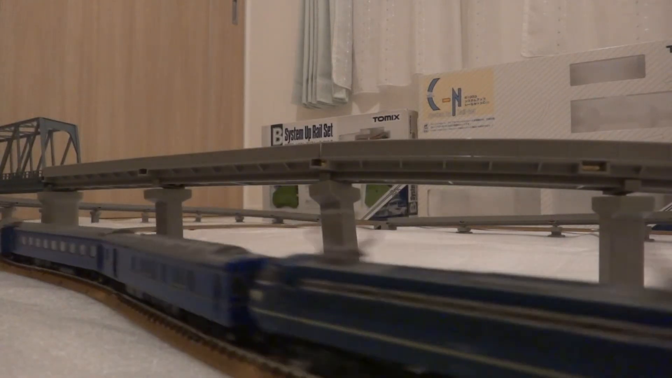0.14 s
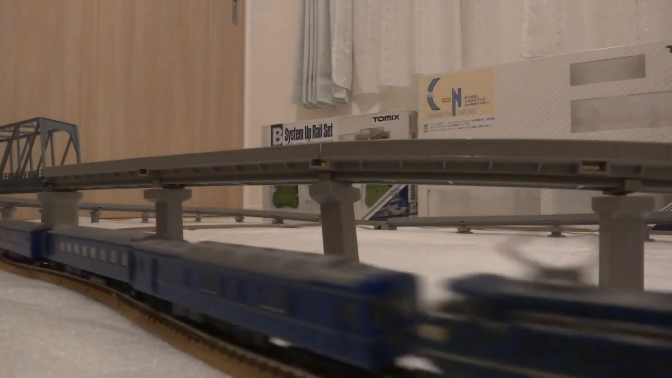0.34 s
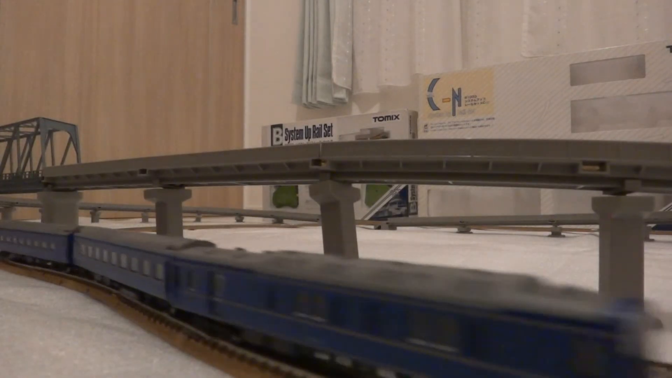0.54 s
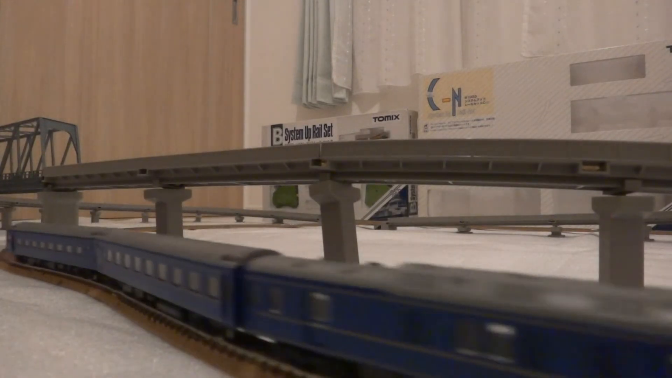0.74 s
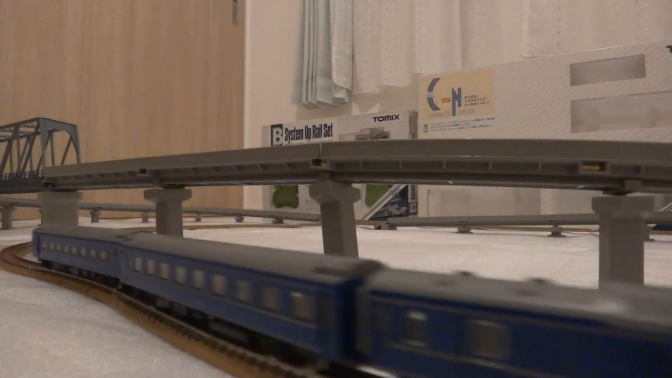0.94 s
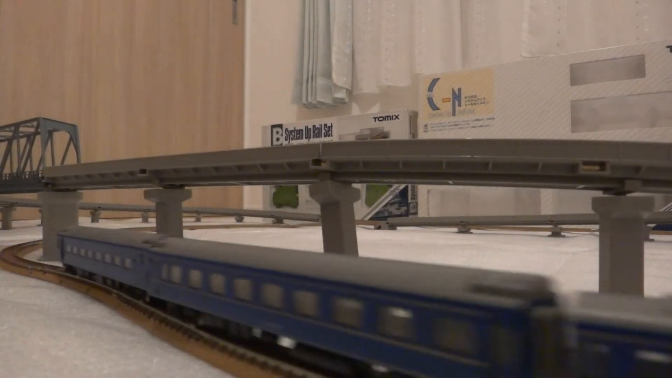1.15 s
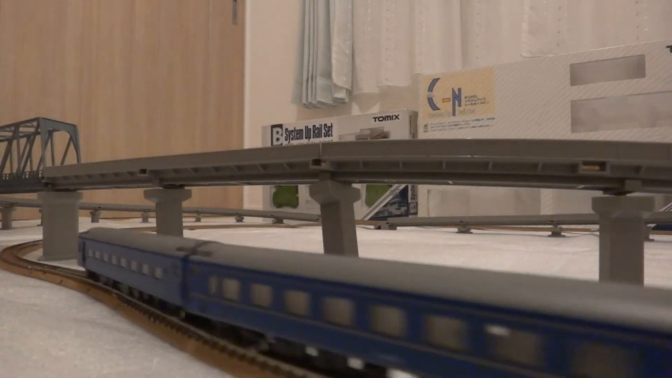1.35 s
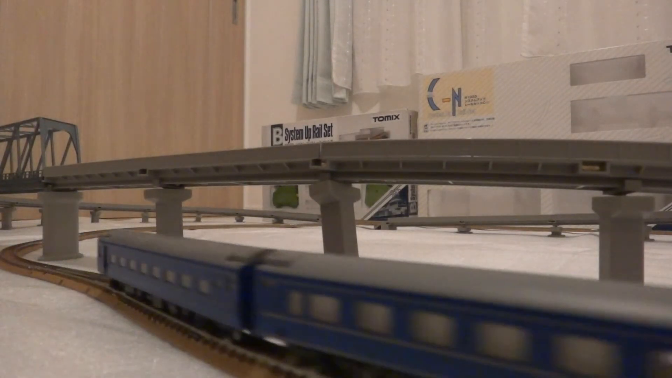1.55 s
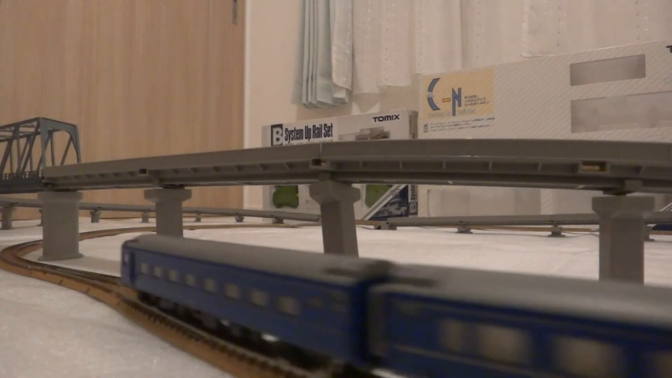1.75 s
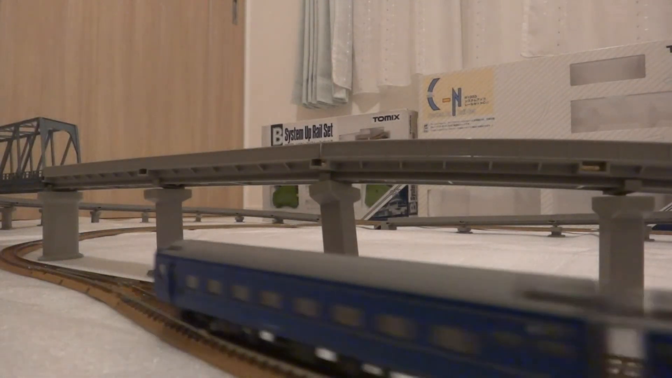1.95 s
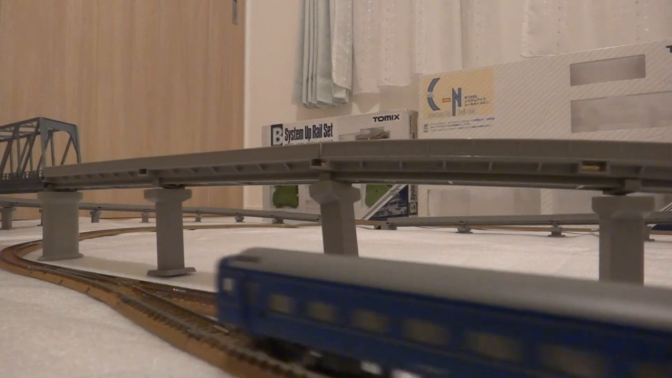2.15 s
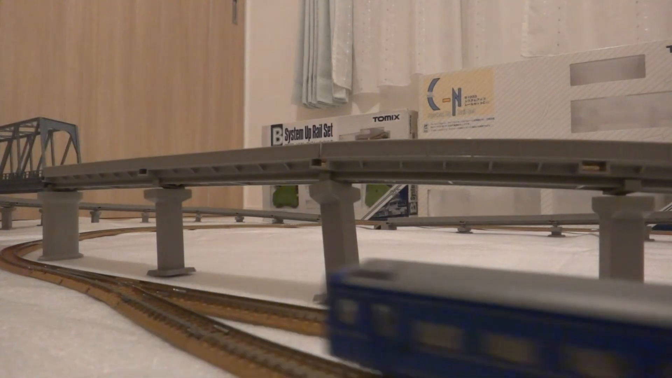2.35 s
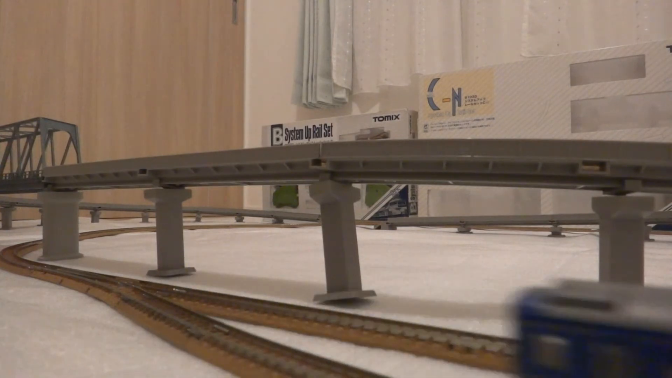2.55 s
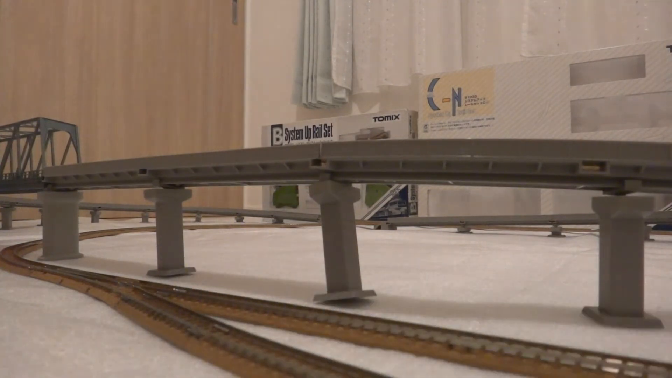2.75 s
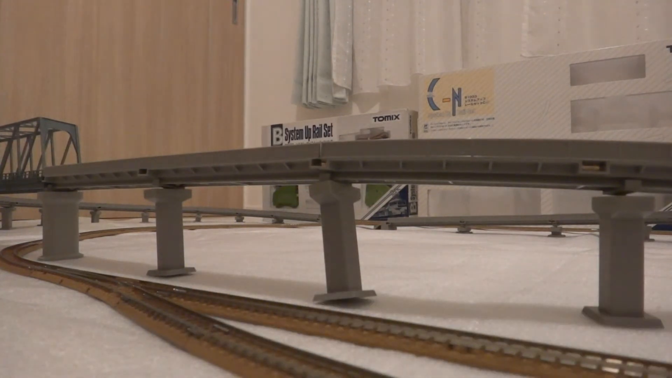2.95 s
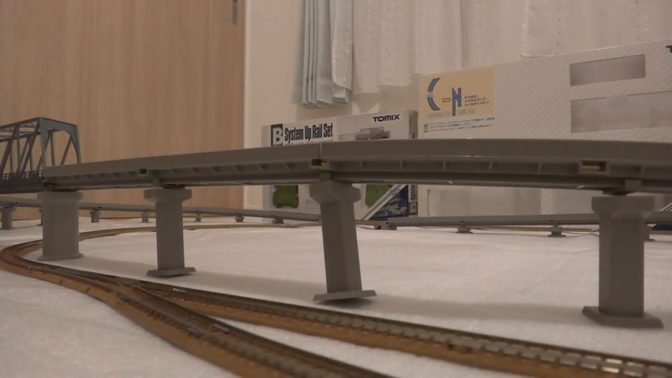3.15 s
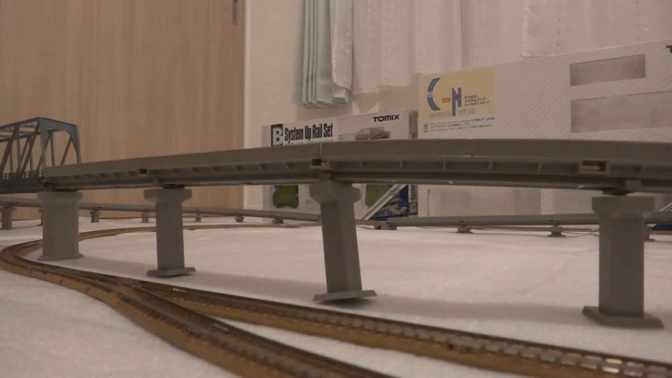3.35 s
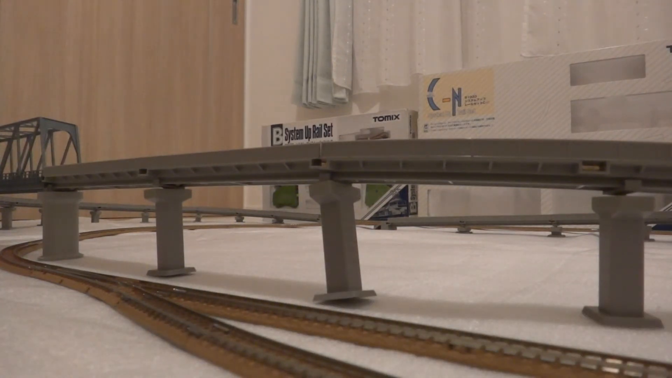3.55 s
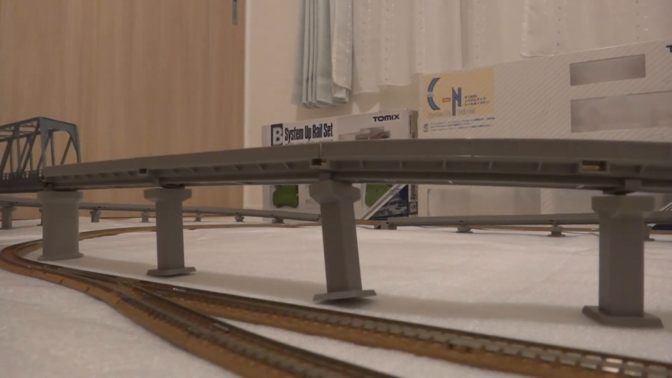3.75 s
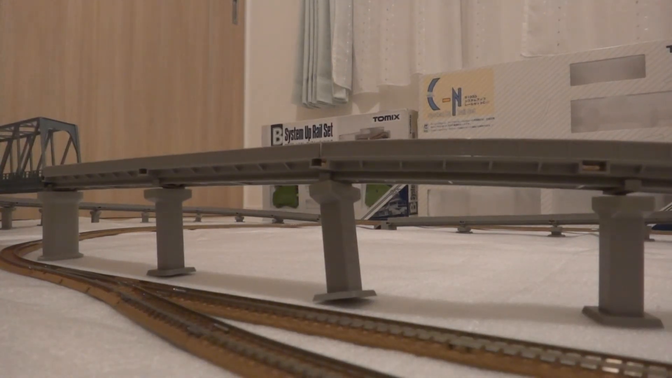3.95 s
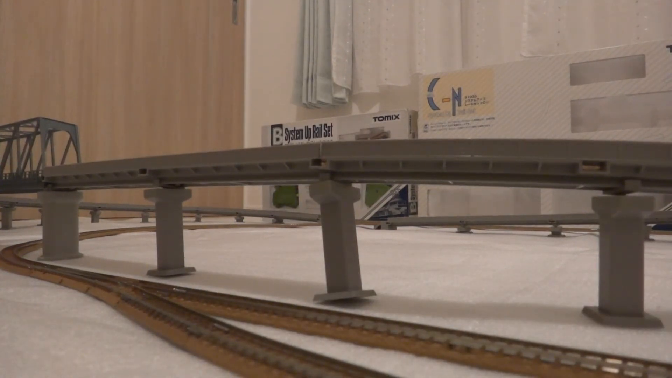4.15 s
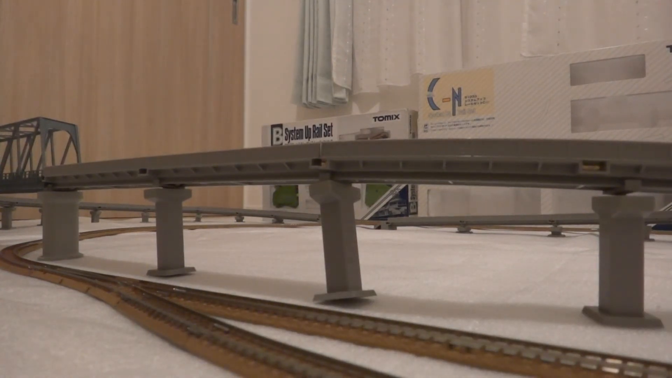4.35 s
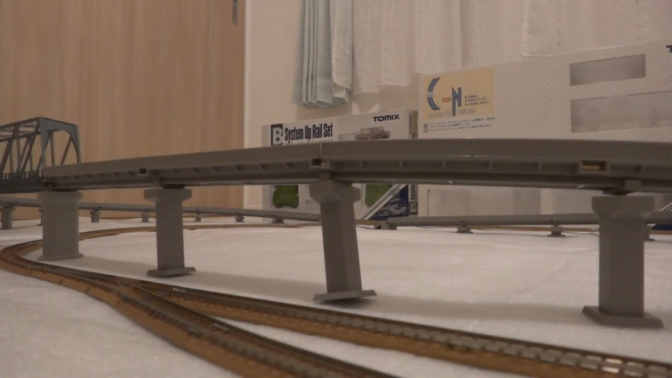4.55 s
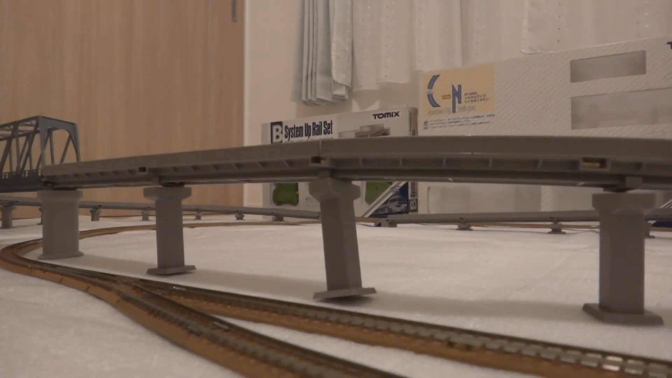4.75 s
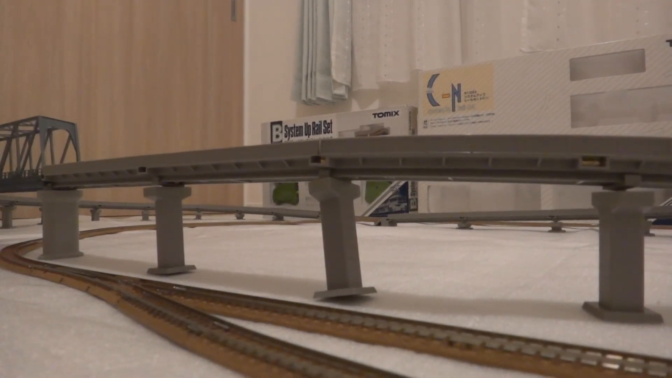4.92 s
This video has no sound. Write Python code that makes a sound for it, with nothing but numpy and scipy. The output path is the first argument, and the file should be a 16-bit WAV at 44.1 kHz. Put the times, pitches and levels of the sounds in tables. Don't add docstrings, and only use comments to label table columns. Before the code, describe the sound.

A microphone low beside plastic track catches a tiny electric train already passing: buzzing shell, hissing brushes, then a dense, dry, treble-heavy wheel roar with crisp clicks over rail joints. The coaches leave after nearly three seconds. Short scraping hisses mark the curve, then the sound thins and dulls to distant metallic rolling around the room, with occasional paired ticks and faint recorder hiss.

```python
import sys
import numpy as np
from scipy import signal
from scipy.fft import rfft, irfft, next_fast_len
from scipy.io import wavfile

SR = 44100
rng = np.random.default_rng(int(sys.argv[2]) if len(sys.argv) > 2 else 0)


def ratio_of_db(decibels):
    return 10 ** (np.asarray(decibels, float) / 20)


def wav_out(sig):
    wavfile.write(sys.argv[1], SR, np.round(np.clip(np.atleast_2d(sig).T, -1, 1) * 32767).astype(np.int16))


N = 224067

# time_s, level_db
MOTOR_RATTLE = [(0, -30.5), (.14, -26), (.21, -25), (0.234, -22.5), (.275, -20), (.3, -20.5), (.335, -21.5),
                (.355, -30), (.41, -23.5), (.46, -26), (.5, -22.5), (.57, -23), (.59, -24), (1.0, -27)]
# pitch_hz, width_hz
SHELL_MODES = [(2910, 760), (3860, 240), (4620, 190)]
# level_db (re rattle at mid-pass), change_db_per_s
SHELL_TURNING = [(0.5, 0.5), (-4, -3), (-5.5, 10)]
# pitch_hz, width_hz, level_db
BRUSH_BANDS = [(7900, 1500, -5.5), (8720, 820, 0.5), (9280, 900, 0.5), (10000, 900, -1),
               (10700, 1000, -2.5), (12200, 1500, -6), (14200, 500, -9), (15200, 1100, -11)]
# time_s, turns_per_s, whine_db
ROTOR = [(0, 191, -68), (.1, 194, -61), (.25, 199, -59), (.33, 203, -55), (.4, 192, -57), (.43, 190, -80),
         (1.0, 200, -85)]
# multiple_of_turn_rate, level_db
WHINE_HARMONICS = [(1, -19), (3, -9), (4, 0)]
# time_s, share_0_to_1
STRUCK_SHARE = [(0, .15), (.2, .3), (.24, .75), (.33, .7), (.4, .3), (.5, .45), (.6, .3), (1.0, .2)]

# time_s, level_db
ROAR = [(0, -23), (.25, -21.5), (.6, -20.5), (.9, -22), (1.2, -23.5), (1.35, -21.5), (1.58, -24.5),
        (1.85, -23), (2.04, -22.5), (2.18, -23), (2.5, -25.5), (2.76, -28.5), (3.3, -28), (3.4, -29),
        (3.46, -30), (4.0, -31), (4.7, -31), (5.08, -31)]
# pitch_hz, density_db_per_hz
NEAR_SPECTRUM = [(15, -75), (25, -44), (148, -36.5), (267, -22.5), (583, -21), (1030, -6), (1270, -4.5),
                 (1710, 0), (2180, 0), (4760, -1.5), (6940, -2.5), (8380, -3.5), (11000, -2.5), (12900, -8),
                 (15600, -23)]
# pitch_hz, density_db_per_hz
FAR_SPECTRUM = [(15, -70), (25, -41), (188, -23.5), (227, -31.5), (483, -20), (1110, -23.5), (1240, -20),
                (2180, -9), (2850, 2.5), (3180, -7), (5160, 2.5), (6580, -8), (9850, -4.5), (11000, -13),
                (15600, -29)]
# pitch_hz, likeness_0_to_1
CHANNEL_LIKENESS = [(60, 1), (180, 0.58), (550, 0.79), (1650, 0.92), (4970, 0.9), (15000, 0.92)]
# time_s, distance_0_to_1
DISTANCE_COLOUR = [(0, 0.055), (.6, 0.097), (2.6, 0.31), (2.95, 0.74), (3.6, 0.75), (5.08, 0.79)]
# time_s, level_db
TRACK_LOAD = [(0, -12.5), (.45, -12), (.52, -8), (.7, -6), (.9, 0), (1.9, 2.5), (2.4, 3), (2.84, 9),
              (2.93, 1), (5.08, 3)]
# time_s, length_s, brightness_db
WHEEL_GLINTS = [(0.103, 0.13, 0.5), (0.334, 0.073, 2), (0.844, 0.06, 0.5), (1.05, 0.11, 0),
                (1.455, 0.047, -2), (1.71, 0.073, 2), (1.835, 0.046, 3), (2.095, 0.14, 4),
                (2.802, 0.13, 2.5), (3.005, 0.05, -1.5), (3.338, 0.053, 5.5), (4.003, 0.18, -4)]
# loudest_s, length_s, pitch_hz, level_db
COACH_PANELS = [(0.519, 0.0054, 597, -47), (.52, .006, 700, -50), (0.575, 0.054, 1050, -48),
                (1.004, 0.25, 1054, -42), (1.85, 0.15, 1110, -44), (2.396, 0.18, 1310, -38.5),
                (2.79, 0.048, 1160, -43), (.15, .15, 2180, -35.5), (0.606, 0.098, 2080, -31),
                (0.76, 0.25, 1670, -34), (0.934, 0.19, 1890, -33.5), (1.133, 0.14, 1566, -35),
                (1.354, 0.086, 1840, -36), (1.8, 0.04, 1730, -44), (1.927, 0.084, 1720, -34.5),
                (2.202, 0.27, 1676, -38), (.13, 0.026, 1000, -52), (0.23, .04, 1130, -47),
                (.36, 0.081, 1110, -48), (2.2, 0.17, 1940, -36), (2.73, 0.28, 1820, -39),
                (2.84, 0.13, 1505, -40), (1.203, 0.06, 2630, -32), (1.303, 0.11, 3360, -33),
                (1.348, .08, 4070, -36), (1.756, 0.058, 2810, -33.5), (1.814, 0.079, 3070, -30.5),
                (1.92, 0.076, 3620, -32), (2.116, 0.058, 3280, -33), (2.197, .06, 2700, -38),
                (2.55, 0.065, 3400, -32), (2.68, 0.081, 3910, -32.5), (1.45, 0.086, 4800, -36),
                (1.746, .05, 4800, -31), (2.13, 0.044, 4820, -29), (2.226, 0.046, 4500, -31),
                (2.4, 0.15, 4640, -32), (.9, .08, 5500, -34), (0.95, 0.04, 6370, -31),
                (1.853, 0.046, 5700, -37), (1.85, .05, 6560, -39), (2.148, .08, 6340, -32),
                (2.353, 0.093, 6400, -35), (2.78, 0.056, 5800, -31), (0.397, 0.25, 7670, -29),
                (1.4, .1, 8350, -29.5), (1.75, 0.074, 8240, -35), (1.997, 0.097, 8100, -31),
                (2.15, 0.079, 8900, -27.5), (2.2, 0.053, 10000, -31), (2.098, 0.066, 10900, -31),
                (2.747, 0.071, 7800, -34), (.45, .1, 14200, -31)]

# release_s, build_up_s, pitch_hz, level_db
FLANGE_RUBS = [(3, .2, 4750, -35), (3.05, .15, 4750, -35.5), (2.6, 0.09, 4750, -36),
               (3.33, 0.12, 4750, -33), (7.9, 0.13, 4750, -32), (3.1, .06, 6050, -33),
               (3.26, 0.067, 6050, -33), (3.7, 0.27, 6050, -29), (3.19, 0.037, 8500, -26.5),
               (3.36, .05, 8500, -43), (2.97, 0.12, 11050, -33), (2.8, 0.13, 11050, -27),
               (3.42, 0.16, 11050, -33)]
# pitch_hz, width_hz
FLANGE_MODES = [(4800, 360), (6050, 620), (8400, 980), (11050, 940)]
# loudest_s, build_up_s, pitch_hz, level_db
WHEEL_SONGS = [(4.99, 0.38, 2780, -36), (7.1, 0.12, 2780, -34), (4.15, 0.068, 3870, -39),
               (5.14, 0.18, 3870, -36), (3.45, 0.17, 4900, -32.5), (3.83, .2, 4900, -34.5),
               (4.5, .1, 4900, -39), (4.17, 0.25, 4900, -37), (3.75, .2, 10080, -44),
               (4.26, 0.29, 10080, -40), (4.7, .2, 10080, -39), (4.85, 0.2, 10080, -40),
               (4.9, .2, 10080, -37)]
# pitch_hz, width_hz
WHEEL_MODES = [(2780, 380), (3870, 180), (4950, 750), (10080, 300)]
# pitch_hz, width_hz, level_db
RAIL_MODES = [(3400, 40, 1), (5920, 180, -1), (6930, 110, -2), (7920, 300, -4), (8840, 250, -13),
              (11530, 250, -4.5), (12550, 490, -7)]

# time_s, crack_peak_db, ring_db (re crack)
FAR_AXLES = [(3.0945, -26, -8), (3.4102, -20, -10), (4.025, -36, -12), (4.2035, -30, -6), (4.346, -31, 5),
             (4.403, -30, -6), (4.6366, -26, -6)]
# first_s, second_s, first_db, second_db, ring_db (re crack)
FAR_BOGIES = [(2.913, 2.986, -20, -21.5, -8), (3.06, 3.125, -27, -27, -6), (3.2368, 3.306, -28, -23, -4),
              (3.418, 3.483, -23, -22, -7), (4.782, 4.8497, -22.5, -25, 0), (4.996, 5.047, -24, -24.5, -3)]
# time_s, crack_peak_db, ring_db (re crack)
NEAR_AXLES = [(0.575, -8.5, -8), (0.6329, -14, -15.9), (0.7259, -25, 0), (0.7611, -14.2, -9.8),
              (0.7922, -22, -5.5), (0.793, -12, -7.5), (0.7971, -9.5, -11), (0.8372, -14, -5),
              (0.876, -14.1, -9), (0.9045, -22, -0.5), (0.915, -23, -7.2), (0.9466, -15, -5.9),
              (0.9835, -11, -7.8), (1.056, -13.5, -1), (1.0953, -12, -12.7), (1.1676, -14.5, -11.8),
              (1.2235, -12, -4.4), (1.2316, -17, -3.3), (1.2964, -11, -5), (1.299, -12, -16),
              (1.311, -15, -1.3), (1.3915, -13, -3.5), (1.4658, -14, -4), (1.499, -16, 6.5),
              (1.5015, -16, -7), (1.5063, -17.6, -3.2), (1.5079, -19, -3.8), (1.5646, -17.5, -3.7),
              (1.5672, -16.5, 2), (1.5736, -17, 5), (1.5759, -13.5, -11.3), (1.5817, -12, -6),
              (1.6221, -14, -14.2), (1.6646, -17, 0), (1.6838, -25, -2.8), (1.6908, -23, -10.6),
              (1.7971, -23, 0), (1.97, -14, 2), (1.9798, -15.3, 4.3), (2.0319, -20, -7),
              (2.0342, -16.2, -5), (2.042, -20, -15.9), (2.0967, -14, -5.3), (2.182, -19, 3),
              (2.1932, -14, -0.1), (2.2427, -18.5, -6.3), (2.255, -16, 0), (2.2569, -10.9, -2),
              (2.34, -27, -5.1), (2.4134, -28.4, 10.3), (2.443, -18.8, -4.4), (2.485, -27, 9),
              (2.5536, -22.0, 2), (2.6464, -28, 8), (2.66, -16, -3), (2.716, -21, 1.2), (2.7313, -33, 1),
              (2.7343, -13, 3), (2.7642, -25, 7), (2.818, -34, -8.4)]
# low_hz, high_hz
TICK_PARTS = [
    (8900, 12800),
    (6800, 9300),
    (2500, 7000),
    (12500, 15000),
]

# time_s, peak_db
FLOOR_KNOCKS = [(0.512, -46), (0.766, -48), (0.83, -44), (1.118, -48), (1.276, -46), (1.489, -44),
                (1.562, -42), (2.253, -46), (2.448, -51), (2.643, -46), (2.729, -44), (2.81, -47)]
# time_s, peak_db
MICROPHONE_BUMP = [(3.6394, -45.5)]
# pitch_hz, width_hz, depth_0_to_1
HOUSING_NOTCHES = [(6900, 700, .25), (12150, 200, .4), (13450, 250, .45), (14700, 250, .4)]
# time_s, left_minus_right_db
STEREO_LEAN = [(0, 1.9), (.25, -1.5), (.5, -2), (.9, -0.8), (1.6, -.6), (2.1, -0.8), (2.6, -1.5), (3.1, -2),
               (3.6, -2.3), (5.08, -2)]
# time_s, low_db, middle_db, high_db
STEREO_WIDTH = [(0, -8, -2, -3), (.2, -8, -4, 0.5), (.35, -7, -3, 2), (.7, -2, 0.5, 4),
                (1.0, -1.5, 0.5, -0.5), (5.08, 5, 0.5, 1.5)]
WIDTH_BORDERS = 2400, 7800


def rms_one(x):
    return x / np.sqrt(np.mean(x ** 2) + 1e-20)


def in_time(rows):
    s, *columns = np.transpose(rows)
    return [np.interp(np.arange(N) / SR, s, c) for c in columns]


def at_hz(points, hz):
    point_hz, values = np.transpose(points)
    return np.interp(np.log(hz), np.log(point_hz), values)


def drift(rate):
    r = np.exp(-32 * np.pi * rate / SR)
    white = rng.standard_normal(N // 16 + 4002)
    slow = signal.lfilter([1], [1, -2 * r, r * r], white)[4000:]
    return np.interp(np.arange(N) / 16, np.arange(len(slow)), rms_one(slow - slow.mean()))


def resonance(x, hz, width_hz):
    r = np.exp(-np.pi * width_hz / SR)
    zeros = np.array([1, 0, -1]) * (1 - r * r) / 2
    return signal.lfilter(zeros, [1, -2 * r * np.cos(2 * np.pi * hz / SR), r * r], x)


def sharp_resonance(x, hz, width_hz):
    return resonance(resonance(x, hz, width_hz), hz, width_hz)


def body(x, modes, patchy_db, rate):
    total = 0
    for k, (hz, width_hz, db) in enumerate(modes):
        gain = ratio_of_db(db + patchy_db * drift(rate))
        total = total + sharp_resonance(x, hz, 1.05 * width_hz) * gain * (-1) ** k
    return rms_one(total)


def ringing(x, modes, levels_db, fade):
    t = np.arange(N) / SR
    since_start, until_end = t - levels_db[0][0], levels_db[-1][0] - t
    sounding = np.clip((np.minimum(since_start, until_end) + fade) / fade, 0, 1)
    total = 0
    for (hz, width_hz), db in zip(modes, in_time(levels_db)):
        total = total + rms_one(sharp_resonance(x, hz, width_hz)) * ratio_of_db(db + .7 * drift(14))
    return sounding * total


def swells(modes, events, rest_db, release_s, start, end):
    t = np.arange(start, end, .005)
    power = np.full((len(modes), len(t)), ratio_of_db(2 * rest_db))
    for s, build_s, hz, db in events:
        nearest = np.argmin([abs(mode[0] - hz) for mode in modes])
        off_peak = np.where(t < s, (s - t) / build_s, (t - s) / release_s)
        power[nearest] += ratio_of_db(2 * db) * np.exp(-off_peak ** 2)
    return np.column_stack([t, *(10 * np.log10(power))])


def spread(mid, side, alike):
    return np.sqrt(1 + alike) * mid + np.sqrt(1 - alike) * side * [[1], [-1]]


def wide_noise(alike):
    mid, side = rng.standard_normal((2, N))
    return spread(mid, side, alike)


def knocks():
    t, thuds = np.arange(N) / SR, 0
    for s, db in FLOOR_KNOCKS:
        after = np.maximum(t - s, 0) / .014
        thuds = thuds + ratio_of_db(db + 17) * after * np.exp(-after)
    rumble = sharp_resonance(thuds * wide_noise(.75), 265, 160)
    bump = 0
    for s, db in MICROPHONE_BUMP:
        push = 1.5 * np.exp(-((t - s) / .00045) ** 2)
        rebound = .35 * np.exp(-((t - s - .0032) / .0018) ** 2)
        bump = bump + ratio_of_db(db) * (rebound - push)
    direct = signal.lfilter([1, -1], [1, -.995], bump)
    return rumble + 1.2 * resonance(bump, 310, 260) + direct


def rattles():
    taps_per_s, level_db = 350, -11
    sizes = ratio_of_db(3.5 * np.minimum(rng.exponential(1, N), 3.5)) * rng.choice([-1, 1], N)
    struck = rng.random(N) < taps_per_s * ratio_of_db(4 * drift(15)) / SR
    taps = sizes * struck + 1e-18
    dealt = rng.integers(0, 12, N)
    rings = 0
    for k, hz in enumerate(np.geomspace(1700, 10500, 12)):
        lean = .2 * (-1) ** k
        rings = rings + resonance(taps * (dealt == k), hz, 350 + .08 * hz) * [[1 + lean], [1 - lean]]
    roar_db, distance = in_time(ROAR)[0], in_time(DISTANCE_COLOUR)[0]
    return ratio_of_db(roar_db + level_db - 5 * distance) * rms_one(rings)


def far_wheels():
    levels_db = swells(WHEEL_MODES, WHEEL_SONGS, rest_db=-58, release_s=0.14, start=3.0, end=5.3)
    wheels = ratio_of_db(-4.0) * ringing(wide_noise(0.96), WHEEL_MODES, levels_db, fade=0.26)
    rails = body(wide_noise(.9), RAIL_MODES, patchy_db=1.5, rate=3)
    return wheels + ratio_of_db(in_time(ROAR)[0] - 7.0) * in_time(DISTANCE_COLOUR)[0] * rails


def flanges():
    levels_db = swells(FLANGE_MODES, FLANGE_RUBS, rest_db=-40.5, release_s=0.0082, start=2.75, end=3.55)
    return ratio_of_db(-2.5) * ringing(wide_noise(0.99), FLANGE_MODES, levels_db, fade=0.095)


def coaches():
    out, rough = np.zeros((2, N)), wide_noise(.97) * ratio_of_db(2.5 * drift(60))
    for s, length, hz, db in COACH_PANELS:
        at = np.arange(max(round((s - 2 * length) * SR), 0), round((s + 2 * length) * SR))
        ring = sharp_resonance(rough[:, at], hz, .085 * hz)
        passing = np.exp(-((at / SR - s) / length) ** 2)
        out[:, at] += ratio_of_db(db) * passing * rms_one(ring)
    return out


def bounce():
    t, light = np.arange(0, N, 32) / SR, 0
    for s, db, _ in NEAR_AXLES:
        if db > -16:
            light = light + (t > s + .002) * np.exp(-np.abs(t - s) / .03)
    return ratio_of_db(-2.6 * np.interp(np.arange(N) / SR, t, np.minimum(light, 1.3)) + .4)


def roar_spectrum(points, hz):
    level = ratio_of_db(at_hz(points, hz))
    return level / np.sqrt(np.mean(level ** 2 * (hz > 1500) * (hz < 7000)))


def rolling():
    coarse = np.arange(0, N, 32)
    roar_db, load_db, distance = (in_time(rows)[0][coarse] for rows in (ROAR, TRACK_LOAD, DISTANCE_COLOUR))
    size = next_fast_len(N)
    hz = np.fft.rfftfreq(size, 1 / SR) + 1
    mid, side = rfft(rng.standard_normal((2, size)))
    pair = spread(mid, side, np.clip(at_hz(CHANNEL_LIKENESS, hz), 0, .99))
    near, far = roar_spectrum(NEAR_SPECTRUM, hz), roar_spectrum(FAR_SPECTRUM, hz)
    bright_db = -0.5 + 0.075 * load_db + 0.03 * distance
    for s, length, db in WHEEL_GLINTS:
        bright_db += db * np.exp(-((coarse / SR - s) / length) ** 2)
    grit = .8 * drift(50) + 1.3 * drift(300) + .6 * drift(12)
    out = 0
    for octave in np.arange(4.5, 14.5, .5):
        shape = np.cos(np.pi * np.clip(np.log2(hz) - octave, -.5, .5)) ** 2
        low = np.interp(octave, [6.1, 10.1, 10.6, 10.82], [0.26, 0.96, 0.55, 0.084])
        high = np.clip((octave - 11.6) / 2.0, 0, 1)
        far_db = np.sum(20 * np.log10(far / near) * shape) / shape.sum()
        slow_db = roar_db + distance * far_db + low * load_db + high * bright_db
        grit_db = (np.interp(octave, [10, 11], [0.33, 0.39]) + .75 * high) * grit
        gain_db = np.interp(np.arange(N), coarse, slow_db) + .7 * drift(7) + grit_db
        out = out + ratio_of_db(gain_db - 3.0) * irfft(pair * near * shape, size)[:, :N]
    return out


def joints():
    far_axles = []
    for s1, s2, db1, db2, ring_db in FAR_BOGIES:
        far_axles += [(s1, db1, ring_db), (s2, db2, ring_db)]
    far_axles += list(FAR_AXLES)
    axles = far_axles + list(NEAR_AXLES)
    is_far = (np.arange(len(axles)) < len(far_axles))[:, None, None]
    distance = np.interp([a[0] for a in axles], *np.transpose(DISTANCE_COLOUR))
    t = np.arange(-200, 400) / SR
    rise_s = .0002
    fall_s = .001 + .0035 * distance[:, None, None] ** 2
    swell = 0
    for s, gain in ((-.0026, is_far * ratio_of_db(-6)), (0, 1)):
        swell = swell + gain * np.where(t < s, np.exp((t - s) / rise_s), np.exp((s - t) / fall_s))
    sprays = rng.standard_normal((len(axles), 2, 600)) * swell
    parts = []
    for band in TICK_PARTS:
        part = signal.sosfilt(signal.butter(3, band, "band", fs=SR, output="sos"), sprays)
        parts.append(part / np.sqrt(np.mean(part[:, :1, 200:240] ** 2, axis=2, keepdims=True)))
    crack, ring, thud, edge = parts
    out = np.zeros((2, N + 600))
    for k, (s, peak_db, ring_db) in enumerate(axles):
        body_db = -19.5 + 0.72 * (peak_db + 24)
        bright = ratio_of_db(-0.5 * distance[k]) * (crack[k] + ratio_of_db(-11) * edge[k])
        tick = ratio_of_db(peak_db - 2.5) * (bright + ratio_of_db(ring_db - 0.8) * ring[k])
        mid, side = tick + ratio_of_db(body_db - 10) * thud[k]
        at = round(s * SR) - 208
        out[:, at:at + 600] += mid + 0.2 * side * [[1], [-1]]
    return out[:, :N]


def locomotive():
    t = np.arange(N) / SR
    turns, whine_db = in_time(ROTOR)
    struck = in_time(STRUCK_SHARE)[0]
    phase = np.cumsum(turns * (1 + .004 * drift(33))) / SR + .35
    once_a_turn = np.diff(np.floor(phase), prepend=0)
    blows = once_a_turn * ratio_of_db(1.3 * rng.standard_normal(N)) * np.sqrt(SR / turns)
    mid_pass_s = 0.62
    shell_db = []
    for s, db in MOTOR_RATTLE:
        shell_db.append((s, *(db + rel_db + turn * (s - mid_pass_s) for rel_db, turn in SHELL_TURNING)))
    force = np.sqrt(struck) * blows + np.sqrt((1 - struck) / 2) * wide_noise(0.89)
    rattle = ringing(force, SHELL_MODES, shell_db, fade=.1)
    facing_db, hold_s, shaded_db, settle_s = -16.5, 0.19, -28, 0.18
    brush_db = shaded_db + (facing_db - shaded_db) * np.exp(-np.maximum(t - hold_s, 0) / settle_s)
    beat = 1 + 0.19 * np.cos(2 * np.pi * phase)
    hiss = ratio_of_db(brush_db) * body(beat * wide_noise(0.98), BRUSH_BANDS, patchy_db=1.6, rate=22)
    whine = 0
    for k, db in WHINE_HARMONICS:
        whine = whine + ratio_of_db(db + 2 * drift(15)) * np.sin(2 * np.pi * k * phase) * np.sqrt(2)
    going = np.clip((MOTOR_RATTLE[-1][0] - t) / .5, 0, 1)
    return going * (rattle + ratio_of_db(-0.5) * hiss + ratio_of_db(whine_db + 1) * whine)


def scene():
    train = bounce() * (rolling() + coaches()) + far_wheels() + flanges() + joints() + locomotive()
    left, right = knocks() + rattles() + train
    mid, side = (left + right) / 2, (left - right) / 2
    low, below_top = (signal.sosfiltfilt(signal.butter(4, hz, fs=SR, output="sos"), side)
                      for hz in WIDTH_BORDERS)
    bands = low, below_top - low, side - below_top
    side = sum(ratio_of_db(db) * band for db, band in zip(in_time(STEREO_WIDTH), bands))
    return (mid + side * [[1], [-1]]) * ratio_of_db(in_time(STEREO_LEAN)[0] * [[.5], [-.5]])


def top_cut(x):
    return signal.sosfilt(signal.butter(12, 15710, fs=SR, output="sos"), x)


def record(dry):
    for hz, width_hz, depth in HOUSING_NOTCHES:
        dry = dry - depth * resonance(dry, hz, width_hz)
    bright_noise = np.diff(wide_noise(0.92), n=3, prepend=np.zeros((2, 3)))
    hiss = ratio_of_db(-41) * rms_one(bright_noise)
    rounded = 1.2 * np.tanh((dry + hiss) / 1.2)
    cut = signal.sosfilt(signal.ellip(8, .3, 50, 15750, fs=SR, output="sos"), rounded)
    return top_cut(cut)


dry = scene()
out = record(dry)
wav_out(out)
```